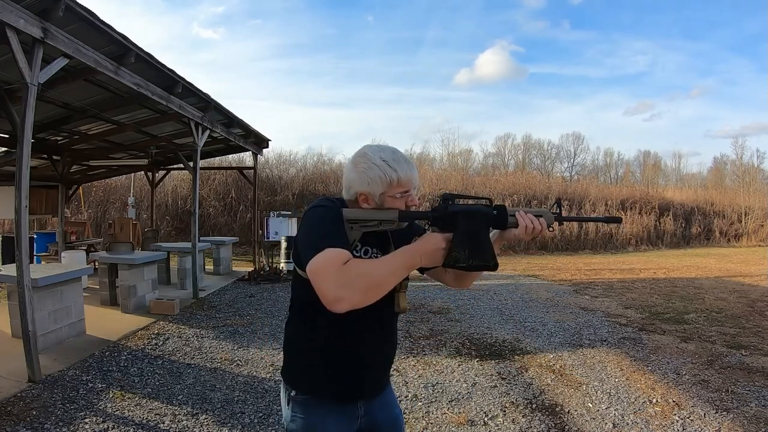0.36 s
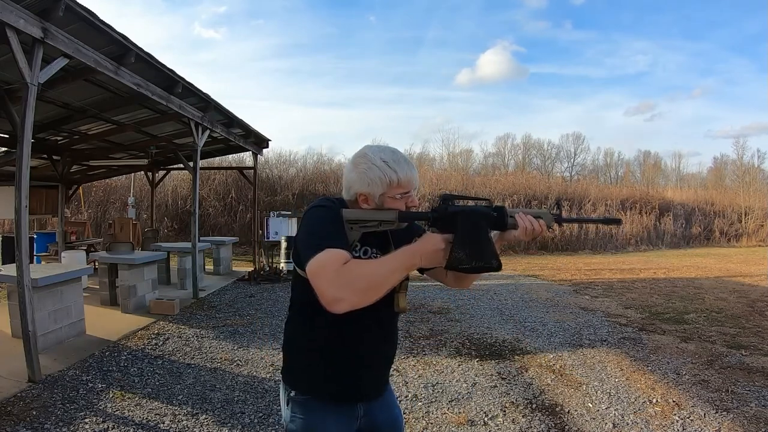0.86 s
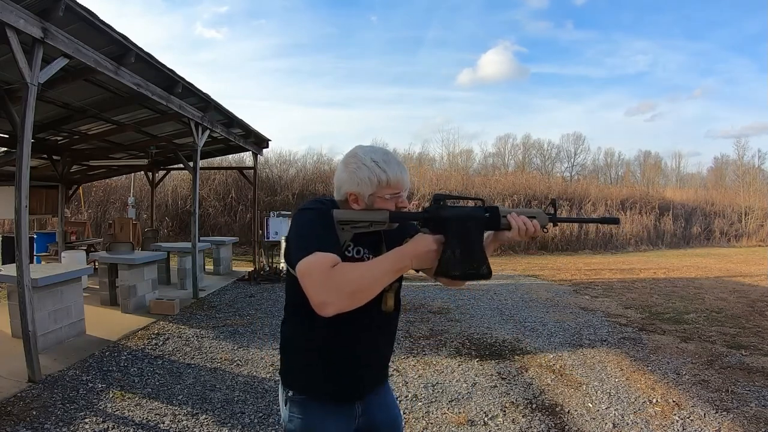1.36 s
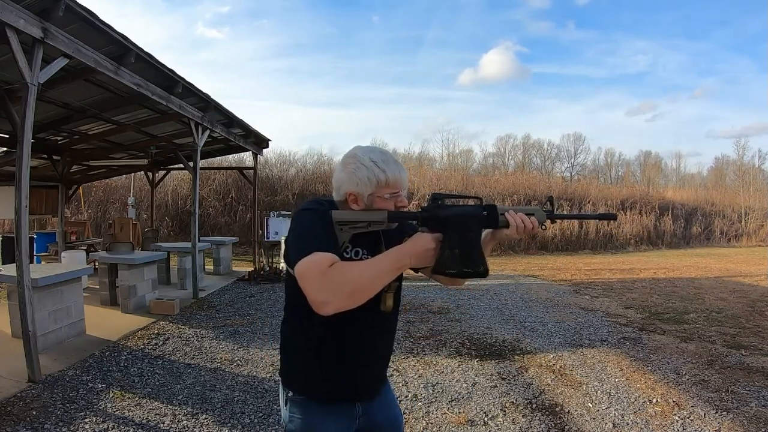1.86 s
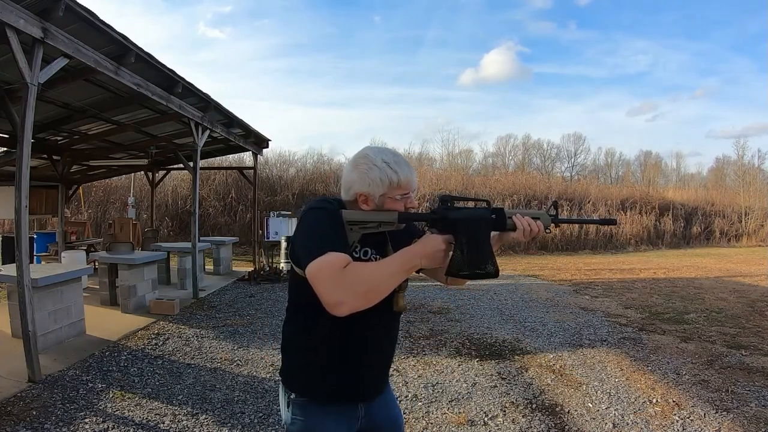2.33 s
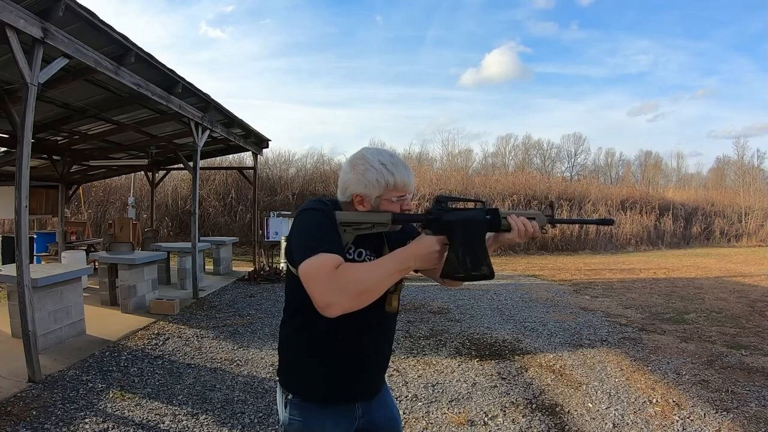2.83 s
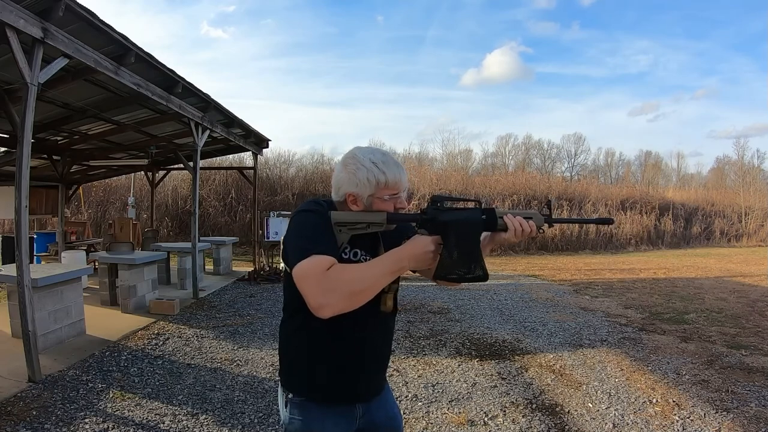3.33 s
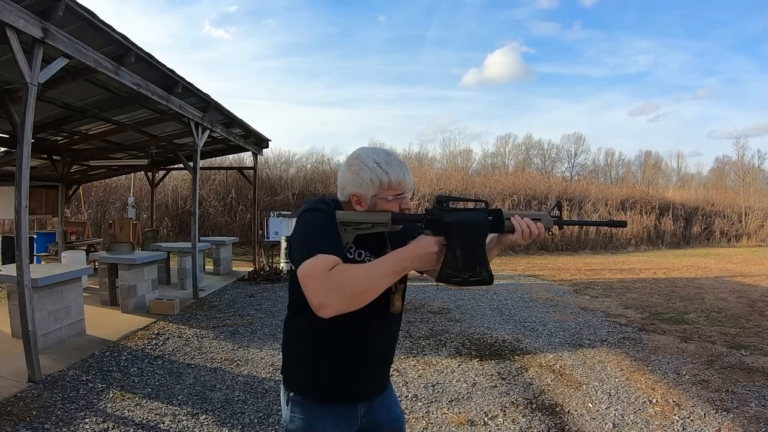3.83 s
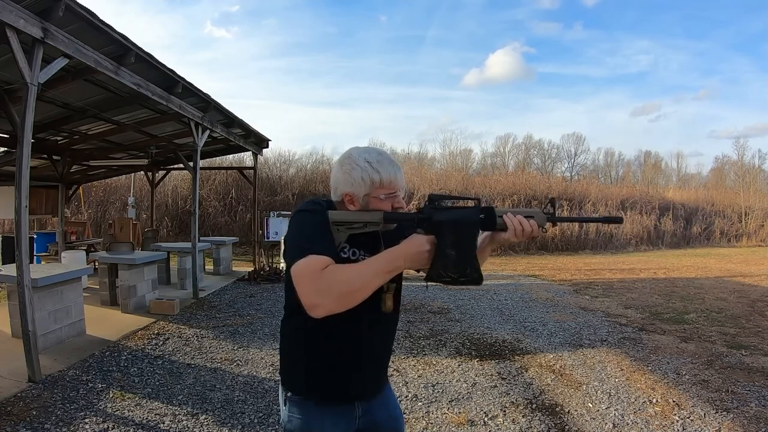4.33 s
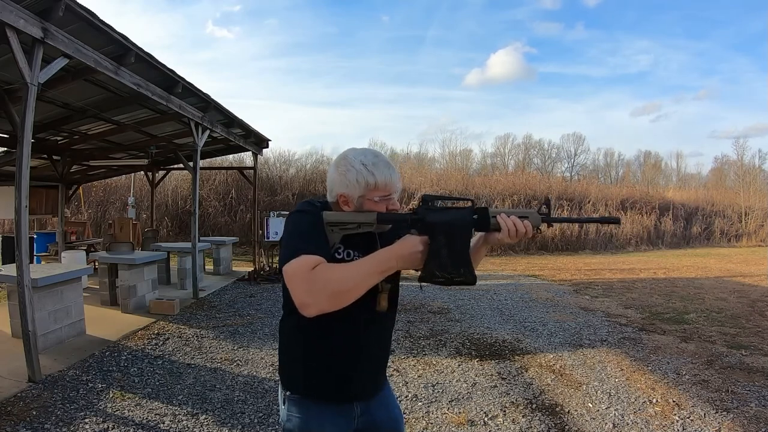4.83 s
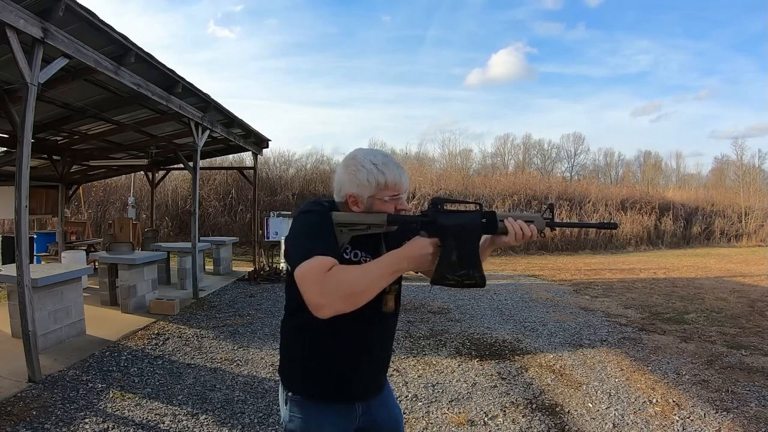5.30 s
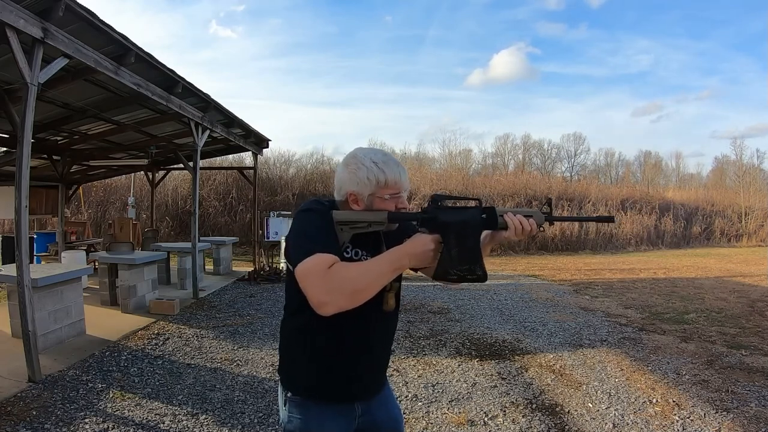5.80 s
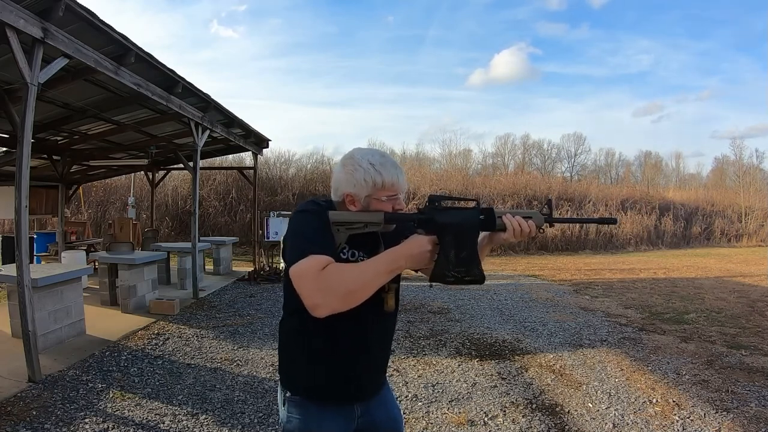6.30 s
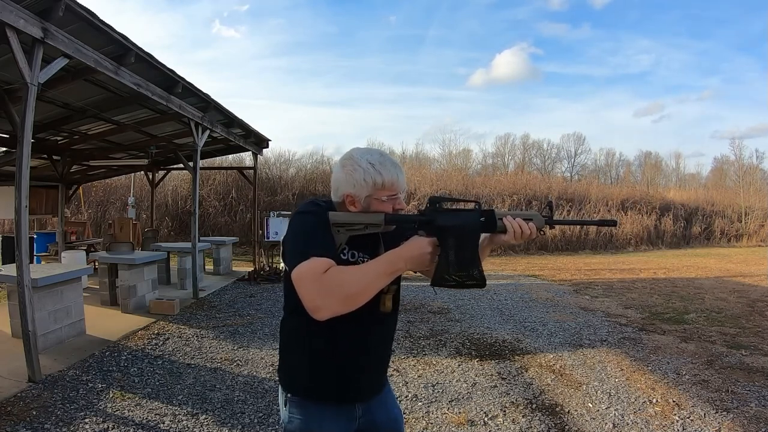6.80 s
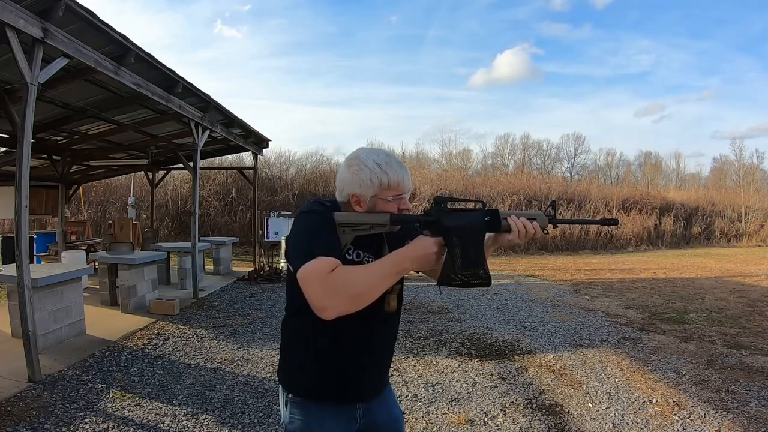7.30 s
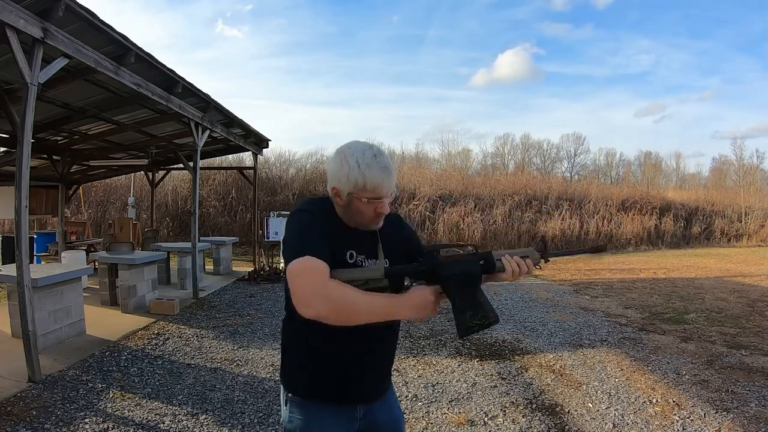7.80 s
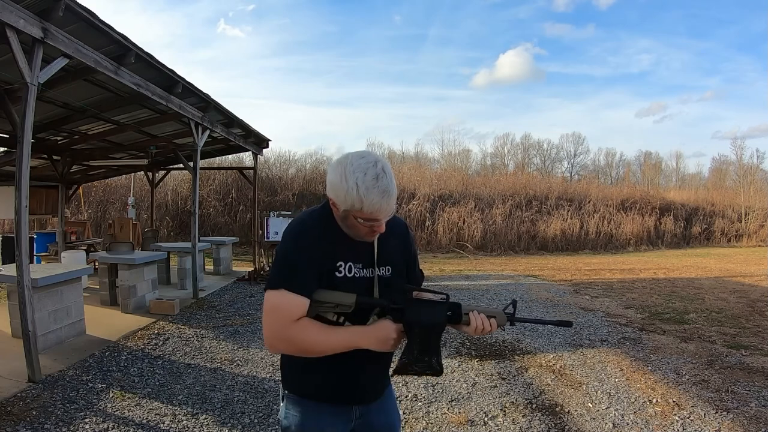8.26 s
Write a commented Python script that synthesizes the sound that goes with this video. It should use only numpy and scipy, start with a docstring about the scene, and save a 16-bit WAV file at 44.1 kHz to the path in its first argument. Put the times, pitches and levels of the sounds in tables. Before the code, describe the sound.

Outdoor shooting range beside a roofed shelter, one microphone close to the shooter. Gusty rumble first, then rapid semi-automatic rifle fire, about five shots a second, in four groups of five. Every shot is a dry, near-clipping crack with dense early reflections and a longer hissing answer from a tree line. Small metal ticks and soft low knocks sit in the pauses, then only the dying tail, light wind and handling.

```python
"""A rifle beside an open shelter on a windy range fires four strings of five shots, each led by a buzzy rasp.
Each blast is a set of pressure fronts, direct and off ground, posts and roof, with decaying noise as scatter.
A tree line some 60 m off (0.37 s there and back) answers with a longer noise tail.
One microphone hears it all: shaped noise makes gusts at first, then rumble, rush and grass hiss.
Dull knocks follow three strings; noise ticks and ringing metal, most of them late, are cases and fittings."""
import sys
import numpy as np
from scipy import signal
from scipy.fft import rfft, irfft, next_fast_len
from scipy.io import wavfile
from scipy.ndimage import map_coordinates

SR = 44100
rng = np.random.default_rng(int(sys.argv[2]) if len(sys.argv) > 2 else 0)


def natural_amplitude(level_db):
    """Convert a level in decibels to a linear amplitude factor, elementwise."""
    exponent = np.asarray(level_db, float) / 20
    return 10 ** exponent


def wrap_up_sound(samples):
    """Save the sound to the file named by the first command line argument, as 16-bit audio."""
    columns = np.atleast_2d(samples).T
    # keep every value between -1 and 1, then stretch to whole-number steps
    tamed = np.clip(columns, -1, 1)
    steps = np.round(tamed * 32767).astype(np.int16)
    wavfile.write(sys.argv[1], SR, steps)


N = 381321

# buffeting at the microphone before the first shot: start_s, level_db
GUSTS = [(0.0, -24), (0.04, -30), (0.084, -22), (0.11, -38), (0.16, -20), (0.232, -38.5), (0.408, -23.5),
         (0.496, -34), (0.758, -27), (0.772, -23), (0.9, -29)]
# level of the grass hiss: start_s, level_db
HISS_LEVEL = [(0, -55.5), (1.9, -56.5), (2.4, -67), (3.5, -59), (3.95, -69), (5.4, -64.5), (7, -84.5),
              (7.6, -72.5), (8.1, -61.5), (8.65, -62)]
# spectra of gusts, low rumble, rush of the field and dry grass: frequency_hz, level_db (per Hz)
GUST_SPECTRUM = [(7.1, -25), (12, -7), (44, 2), (68, -3.5), (108, -20.5), (159, -9.5), (270, -24),
                 (386, -25.5), (700, -44.5), (910, -85.5), (1540, -120)]
RUMBLE_SPECTRUM = [(8.8, -46), (15, -5), (48, 5), (97, -6), (119, -6.5), (130, -2), (170, -41), (290, -120)]
RUSH_SPECTRUM = [(59, -35.5), (100, -18.5), (156, -2.5), (369, -11), (686, -10), (807, -14), (961, -18.5),
                 (1060, -19), (2500, -32.5), (3250, -67.5), (5500, -120)]
HISS_SPECTRUM = [(710, -31.5), (1200, -2), (1350, -4), (1690, -1.5), (2650, -5.5), (3140, -2.5),
                 (4570, -12.5), (7090, -21.5), (8070, -24.5), (9890, -32.5), (10900, -33.5), (15500, -59.5)]
# ticks of cases and fittings: start_s, peak_db (of the tick), centre_hz, ring_db (relative to the tick)
CLICKS = [(.425, -52, 7920, -30), (.478, -48, 4500, -40), (5.056, -43, 8000, -25), (6.694, -36, 5470, -35),
          (6.862, -69, 9000, -9), (7.504, -45, 3900, -50), (7.504, -50, 5800, -50), (7.991, -65, 6960, -20),
          (8.074, -60, 5500, -37), (8.11, -68, 8000, -14), (8.217, -37, 1250, -60),
          (8.240, -45.5, 4300, -17)]
# ringing of a small metal part: pitch_hz, level_db (relative to ring_db), t60_s
METAL = [(10900, 0, .16), (13200, -5, .14)]
# brush of a sleeve: start_s, end_s, level_db, centre_hz, width_hz
RUSTLE = (8.293, 8.354, -61, 3900, 1500)
# shots: start_s, rasp_db, rasp_lead_s (before the bang), loudest_hz (strongest band of the rasp)
SHOTS = [(0.9567, -13.5, 0.052, 3380), (1.1374, -18, 0.025, 4330), (1.3247, -18.5, .028, 2060),
         (1.5048, -16, 0.029, 6200), (1.6772, -17, 0.026, 2440), (2.5037, -14, .039, 1030),
         (2.6892, -18, 0.032, 4800), (2.8836, -16.5, 0.033, 4100), (3.0547, -21.5, 0.031, 3380),
         (3.2335, -19, 0.032, 2080), (4.071, -17, 0.041, 2860), (4.2838, -15, 0.032, 5540),
         (4.4673, -15.5, 0.033, 1620), (4.664, -15.5, 0.033, 3300), (4.8531, -19, 0.035, 6700),
         (5.7172, -15, 0.039, 1630), (5.9321, -17, 0.034, 4900), (6.1206, -17, 0.029, 1720),
         (6.3163, -18, 0.034, 3280), (6.4895, -17, 0.025, 3500)]
# spectrum of the rasp: frequency_hz, level_db (per Hz)
RASP_SPECTRUM = [(59, -30.5), (100, 6), (238, -3.5), (429, -5), (1060, -0.5), (2370, -18.5), (2870, -10.5),
                 (4860, -16), (8060, -22), (15500, -53)]
# narrow bands in the rasp ahead of the first shot: pitch_hz, level_db (amplitude over the rasp's rms)
BUZZ_TONES = [(152, 3), (700, -6), (2013, -5), (2487, -10), (2955, -6), (3424, -5), (4544, -8), (5297, -13)]
# strong paths, direct and off ground, posts and roof: delay_ms, peak_db (under the blast level), front_ms
PATHS = [(0.08, -1.3, 0.3), (2.48, -8.5, 0.1), (2.66, -3.1, 0.15), (3.0, -7.5, 0.1), (3.71, -12.6, 1.0),
         (5.77, -4.0, 0.3), (7.15, -13.4, 0.3), (12.78, -21.3, 0.7), (18.97, -12.9, 0.7), (20.4, -9.5, 0.3),
         (22.6, -12.8, 0.3), (23.18, -13.0, 1.0), (30.69, -20.3, 0.3), (32.3, -16.0, 0.2),
         (33.46, -15.6, 0.3)]
# shortest and longest front of the weaker paths: front_ms, front_ms
LATE_FRONT_MS = (.2, 1)
# treble lost to rough surfaces round the later fronts: delay_ms, cutoff_hz
DULLING = [(0, 3250), (10, 1000), (25, 1900), (130, 1000)]
# low cut of the microphone port, a resonance passed twice: resonance_hz, sharpness (no unit)
PORT = (160, 1.8)
# spectrum of the noise that starts with the bang: frequency_hz, level_db (per Hz)
CRACK_SPECTRUM = [(710, -2), (1200, -6), (1520, -5.5), (2510, -12.5), (4070, -16), (5260, -18.5),
                  (6240, -19.5), (9570, -28.5), (15500, -64.5)]
# low push on the camera body: pitch_hz, level_db (before a random shift per shot), t60_s
THUMP = (59.6, -18, 0.084)
# scatter in the shelter: frequency_hz, level_db (per Hz); then frequency_hz, t60_s
SHELTER_SPECTRUM = [(29, -55), (50, -11), (108, -5.5), (206, -2.5), (250, -18), (333, -5), (466, -5),
                    (607, 3), (668, 4), (1000, -4), (1340, -15.5), (2060, -20.5), (7920, -45.5),
                    (15500, -71.5)]
SHELTER_T60 = [(100, 0.41), (300, 0.81), (700, 0.28), (2000, 0.53), (5000, 1), (12000, 0.92)]
# answer of the brush and trees: frequency_hz, level_db (per Hz); then frequency_hz, t60_s
TREES_SPECTRUM = [(35, -45), (60, -5.5), (146, -5), (182, 0), (303, -9), (461, -6), (658, -4), (735, -9),
                  (4940, -28), (7700, -36.5), (12000, -69.5), (15600, -100), (22000, -120)]
TREES_T60 = [(100, 1.54), (600, 2.24), (3000, 1.92), (8000, 1.14)]
# short dull knocks after a string: centre_s, level_db, pitch_hz
THUDS = [(3.4452, -23, 215), (5.0635, -22, 235), (6.6975, -26, 260)]
# resonances of the microphone housing: centre_hz, width_hz, lift_db
HOUSING = [(4750, 250, 2), (7800, 280, 4), (10800, 300, 4)]


def unit(x):
    """Scales to rms 1."""
    return x / np.sqrt(np.mean(x ** 2) + 1e-20)


def along(points, hz):
    """Reads (Hz, value) points on a log frequency axis."""
    f, value = np.transpose(points)
    return np.interp(np.log(hz + 1), np.log(f + 1), value)


def curve(rows):
    """One value per sample from (s, value) rows."""
    s, value = np.transpose(rows)
    return np.interp(np.arange(N) / SR, s, value)


def wobble(rate):
    """A smooth random curve of rms 1, rate knots a second."""
    knots = rng.standard_normal(int(N * rate / SR) + 4)
    return unit(map_coordinates(knots, [np.arange(N) * rate / SR]))


def filtered(x, response):
    """Applies a response given as a function of frequency."""
    m = next_fast_len(len(x) + 8192)
    return irfft(rfft(x, m) * response(np.fft.rfftfreq(m, 1 / SR)), m)[:len(x)]


def noise(spectrum, count=N):
    """Coloured noise of rms 1."""
    return unit(filtered(rng.standard_normal(count), lambda hz: natural_amplitude(along(spectrum, hz))))


def tail(spectrum, t60s, count):
    """Coloured noise that starts at rms 1; each frequency dies at its own speed."""
    hz, t, z = signal.stft(noise(spectrum, count), SR, nperseg=256)
    decay = natural_amplitude(-60 * t / along(t60s, hz)[:, None])
    return signal.istft(z * decay, SR, nperseg=256)[1][:count]


def add(track, s, sound):
    """Mixes a sound in at time s."""
    part = track[round(s * SR):][:len(sound)]
    part += sound[:len(part)]


def wind():
    """Lumpy gusts on the port, over low rumble, the rush of the field and the hiss of dry grass."""
    calm_s, calm_db = 1, -70
    rumble_db, rush_db = -55, -49
    rush_follows = 0.13  # share of the hiss's swings, in dB, that the rush takes
    gust_db = curve([*GUSTS, (calm_s, calm_db)])
    hiss_db = curve(HISS_LEVEL)
    rush_db = rush_db + rush_follows * (hiss_db - hiss_db.mean())
    gusts = natural_amplitude(gust_db) * unit(natural_amplitude(0.99 * wobble(30)) * noise(GUST_SPECTRUM))
    rumble = natural_amplitude(rumble_db + 2.2 * wobble(1.1) + 3 * wobble(19)) * noise(RUMBLE_SPECTRUM)
    rush = natural_amplitude(rush_db + 0.63 * wobble(14)) * noise(RUSH_SPECTRUM)
    hiss = natural_amplitude(hiss_db + 0.4 * wobble(27)) * noise(HISS_SPECTRUM)
    return gusts + rumble + rush + hiss


def metal_ring(t):
    """Decaying sines of a small metal part, with a soft start."""
    modes = sum(natural_amplitude(db - 60 * t / t60) * np.sin(2 * np.pi * hz * t) for hz, db, t60 in METAL)
    return modes * (1 - np.exp(-t / .001))


def cloth():
    """A sleeve brushes past: band-limited noise made grainy by a fast random level."""
    start, end, db, centre_hz, width_hz = RUSTLE
    grains = rng.standard_normal(N) * natural_amplitude(2.4 * wobble(280))
    grains = grains[:round((end - start) * SR)]
    return natural_amplitude(db) * unit(filtered(grains, lambda f: np.exp(-((f - centre_hz) / width_hz) ** 2)))


def handling():
    """Short band-passed noise ticks, each with its share of metal ring, and the brush of cloth."""
    out, t = np.zeros(N), np.arange(SR // 4) / SR
    ring = metal_ring(t)
    for s, db, hz, ring_db in CLICKS:
        tick = rng.standard_normal(len(t)) * natural_amplitude(-60 * t / .014) * np.clip(t / .001, 0, 1)
        tick = filtered(tick, lambda f: (1j * f * hz / (hz * hz - f * f + 1j * f * hz)) ** 5)
        add(out, s, natural_amplitude(db) * (tick / np.abs(tick).max() + natural_amplitude(ring_db) * ring))
    add(out, RUSTLE[0], cloth())
    return out


def rasp(lead, loudest_hz, tones):
    """A buzzy noise of narrow bands, new for each shot, swells ahead of the bang and stops with it."""
    swell_s = 0.037  # with a longer lead the level holds until the bang
    t = np.arange(-SR // 16, 0) / SR
    z, f = rfft(noise(RASP_SPECTRUM, len(t))), np.fft.rfftfreq(len(t), 1 / SR)
    fine = rng.standard_normal(len(z))
    bands = np.repeat(rng.standard_normal(len(z) // 16 + 1), 16)[:len(z)]
    lift_db = 8 * np.exp(-((f - loudest_hz) / 260) ** 2)
    buzz = unit(irfft(z * natural_amplitude(5.8 * fine + 2 * bands + lift_db), len(t)))
    for hz, db in tones:
        drift = np.cumsum(rng.normal(0, .14, len(t))) * np.sqrt(hz / SR)  # wandering phase blurs the tone
        buzz = buzz + natural_amplitude(db) * np.sin(2 * np.pi * (hz * t + rng.random()) + drift)
    rise = np.sin(np.pi / 2 * np.clip((t + lead) / min(lead, swell_s), 0, 1)) ** 3.5
    return buzz * rise * np.clip(-t / .0006, 0, 1)


def late_paths():
    """Many small surfaces, unevenly spaced: the later and blunter the front, the weaker."""
    from_ms, to_ms, count = 35, 185, 42
    start_db, fall_db_per_ms, blunt_db_per_ms = -13.5, 0.25, 5  # fall with delay, loss with front length
    place, blunt = rng.random((count, 2)).T
    ms = from_ms + (np.arange(count) + place) * (to_ms - from_ms) / count
    shortest, longest = LATE_FRONT_MS
    front = shortest + (longest - shortest) * blunt ** 2
    db = start_db - fall_db_per_ms * (ms - from_ms) - blunt_db_per_ms * front
    return list(zip(ms, db, front))


def blast():
    """A pressure front and its suction along every path, rung by the microphone's low cut."""
    port_hz, sharp = PORT
    t, out = np.arange(2048) / SR, np.zeros(SR // 4)
    for ms, db, front in PATHS + late_paths():
        u = t * 1000 / front  # time in front lengths
        dull_hz = np.interp(ms, *np.transpose(DULLING))

        def port_and_dulling(f):
            """Resonant low cut and treble loss, both passed twice."""
            low_cut = f * f / (port_hz * port_hz - f * f + 1j * f * port_hz / sharp)
            return (low_cut / (1 + 1j * f / dull_hz)) ** 2

        pulse = filtered(u * (u - 2) * np.exp(-u), port_and_dulling)
        add(out, ms / 1000, natural_amplitude(db) * pulse / np.abs(pulse).max())
    return out


def crack(t):
    """Broad noise that starts with the bang: a fast fall, then a weaker and slower one."""
    rise_s = .0005
    fall = natural_amplitude(-11.5 - 60 * t / 0.015) + natural_amplitude(-22.5 - 60 * t / 0.36)
    return noise(CRACK_SPECTRUM, len(t)) * np.clip(t / rise_s, 0, 1) * fall


def thump(t):
    """The low push on the camera body, a decaying sine of varying strength."""
    hz, db, t60 = THUMP
    strength = natural_amplitude(2.5 * rng.standard_normal())
    return -strength * natural_amplitude(db - 60 * t / t60) * np.sin(2 * np.pi * hz * t)


def shelter_scatter(t, still):
    """Dense reflections in bunches: a part common to all shots and a part renewed by moving air."""
    build = np.clip((t - .012) / 0.082, 0, 1)  # scatter takes over from the single paths
    clumps = natural_amplitude(2.17 * wobble(63.7)[:len(t)])
    moving = tail(SHELTER_SPECTRUM, SHELTER_T60, len(t))
    return natural_amplitude(-16.5) * build * clumps * (0.92 * still + 1.29 * moving)


def trees_swell(count):
    """Level of the far answer: faint nearer brush at once, the tree line after its travel time."""
    arrival_s, rise_s, trees_db = 0.37, 0.0074, -32.5
    brush_db, brush_rise_s = -18, 0.12  # level relative to the trees
    depth_db_per_s = 5  # rows further back keep feeding the answer
    t = np.arange(count) / SR
    brush = natural_amplitude(brush_db) * np.clip(t / brush_rise_s, 0, 1)
    trees = 1 / (1 + np.exp((arrival_s - t) / rise_s))
    return (brush + trees) * natural_amplitude(trees_db + depth_db_per_s * t)


def rifle():
    """Every shot repeats one blast pattern and the still scatter; its other noise is new."""
    blast_db = -0.66  # every cartridge alike
    short, long = SR, 2 * SR
    out, wave, t = np.zeros(N), blast(), np.arange(short) / SR
    still = tail(SHELTER_SPECTRUM, SHELTER_T60, short)
    swell = trees_swell(long)
    for k, (s, rasp_db, lead, loudest_hz) in enumerate(SHOTS):
        ahead = rasp(lead, loudest_hz, BUZZ_TONES if k == 0 else ())
        add(out, s - len(ahead) / SR, natural_amplitude(rasp_db) * ahead)
        add(out, s, natural_amplitude(blast_db) * wave)
        add(out, s, crack(t) + thump(t) + shelter_scatter(t, still))
        add(out, s, swell * tail(TREES_SPECTRUM, TREES_T60, long))
    return out


def thuds():
    """Dull knocks, each little more than one cycle of low pressure swing."""
    out, t = np.zeros(N), np.arange(-512, 512) / SR
    for s, db, hz in THUDS:
        swing = np.sin(2 * np.pi * hz * t) * np.exp(-(t * hz / .6) ** 2)
        add(out, s + t[0], natural_amplitude(db) * 1.3 * swing)
    return out


def scene():
    """Everything reaches one microphone."""
    return (wind() + handling() + rifle() + thuds())[None]


def housing(f):
    """Gain of the microphone housing, which lifts three treble bands."""
    return natural_amplitude(sum(db * np.exp(-((f - hz) / width) ** 2) for hz, db, width in
                   [(hz, db, width) for hz, width, db in HOUSING]))


def roll_off(x):
    """The treble ends steeply here."""
    return signal.sosfilt(signal.butter(12, 15750, fs=SR, output="sos"), x)


def record(dry):
    """The housing colours the treble, the loudest peaks are rounded off, the top is cut."""
    x = filtered(dry[0], housing)
    x = x / (1 + np.abs(x / 1.05) ** 8) ** (1 / 8)  # smooth ceiling at 1.05
    mix = filtered(x, lambda f: f < 15750)[None]  # Hz
    return roll_off(mix)


dry = scene()
out = record(dry)
wrap_up_sound(out)
```